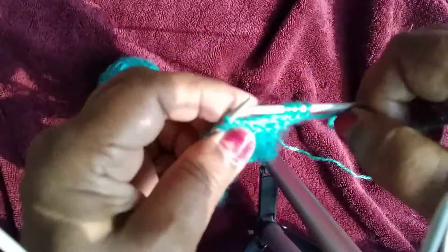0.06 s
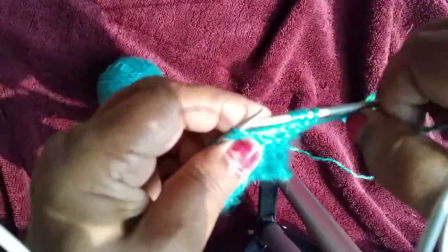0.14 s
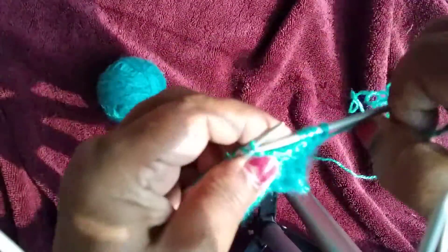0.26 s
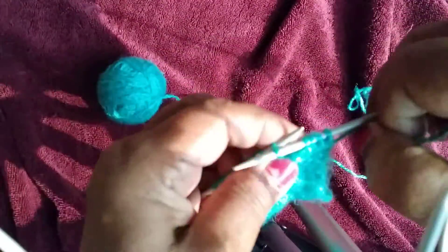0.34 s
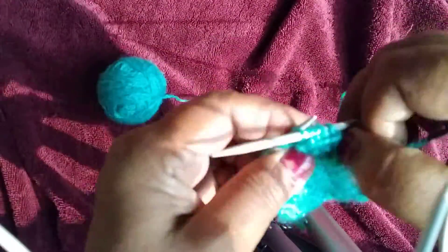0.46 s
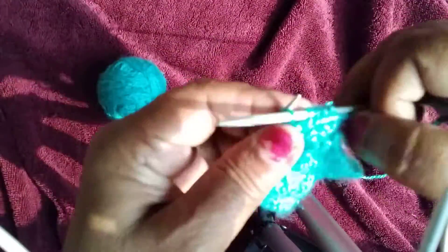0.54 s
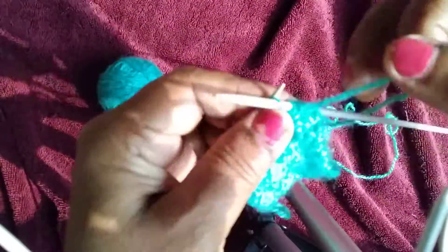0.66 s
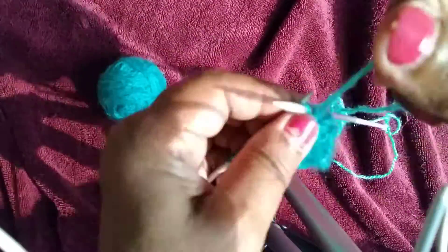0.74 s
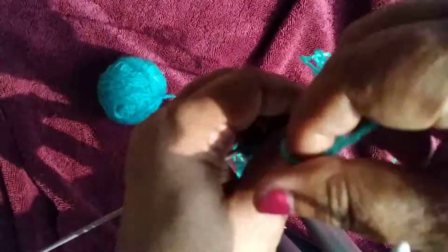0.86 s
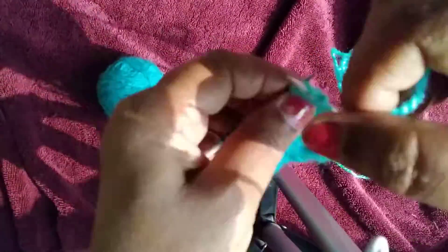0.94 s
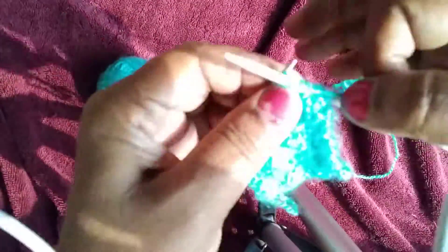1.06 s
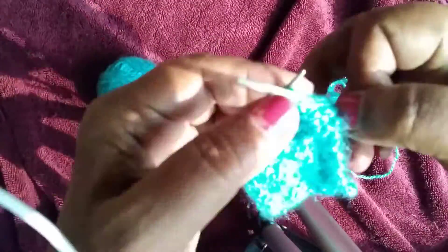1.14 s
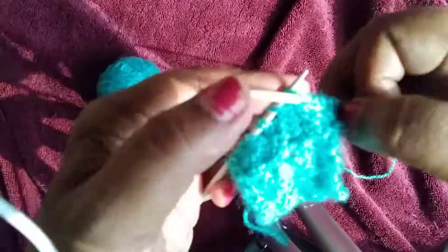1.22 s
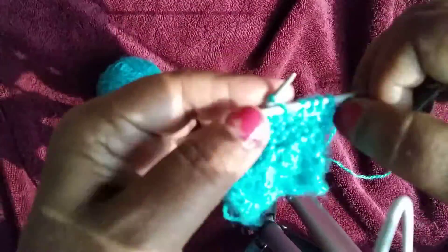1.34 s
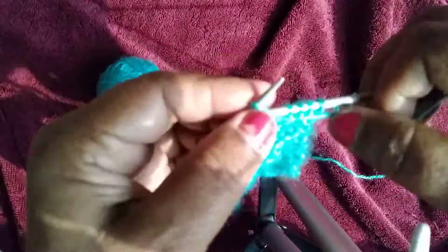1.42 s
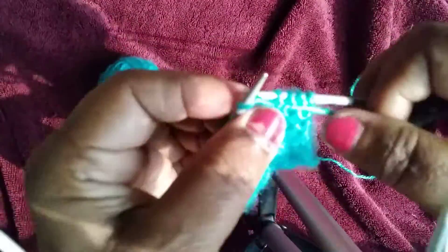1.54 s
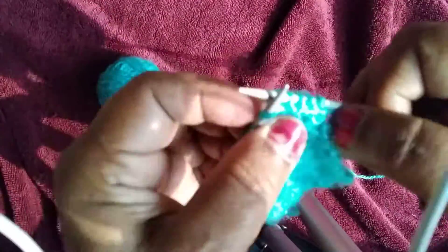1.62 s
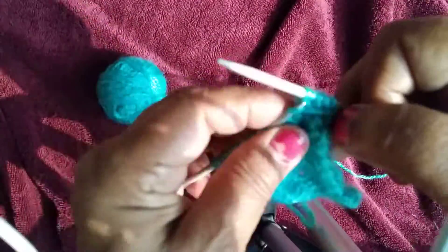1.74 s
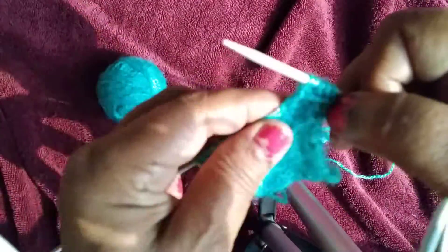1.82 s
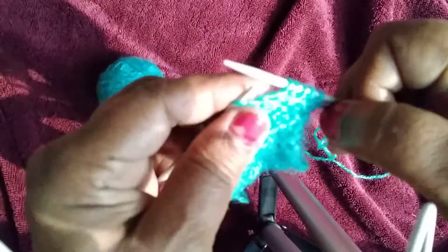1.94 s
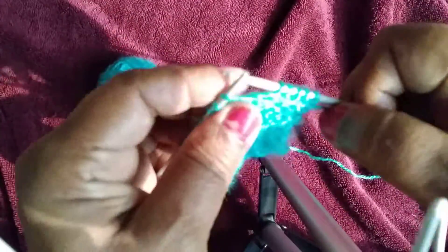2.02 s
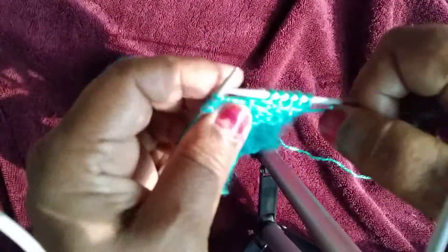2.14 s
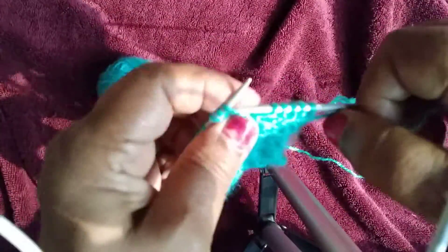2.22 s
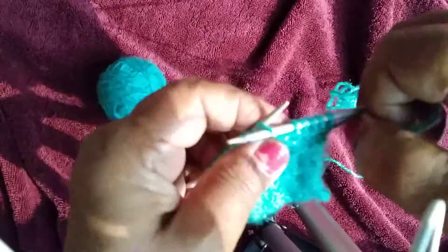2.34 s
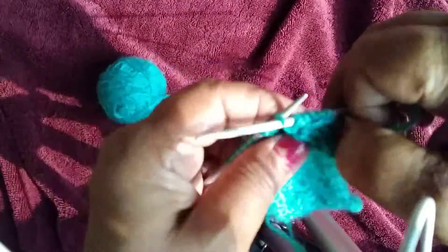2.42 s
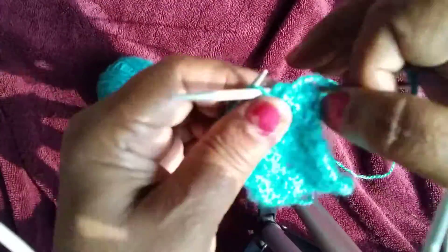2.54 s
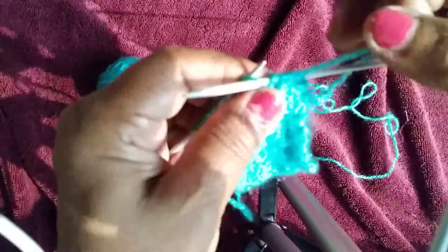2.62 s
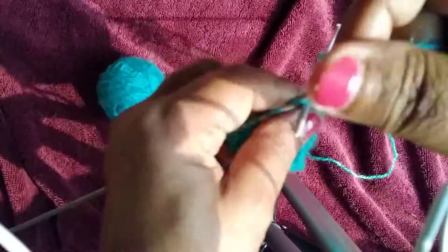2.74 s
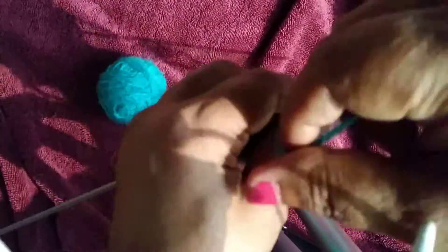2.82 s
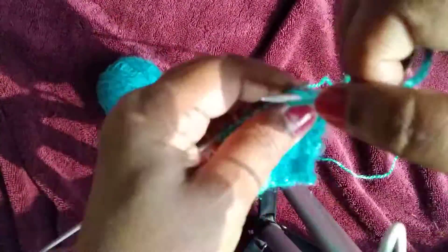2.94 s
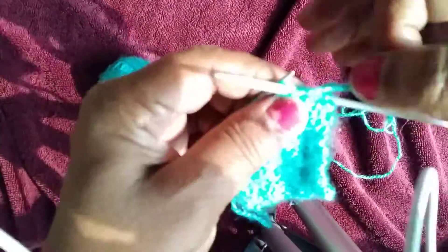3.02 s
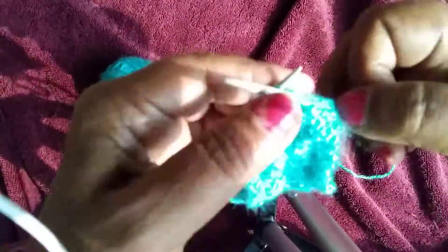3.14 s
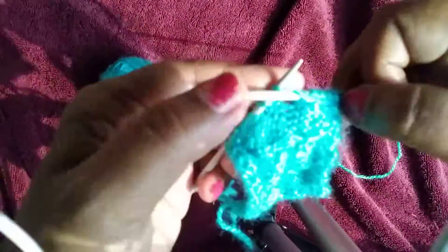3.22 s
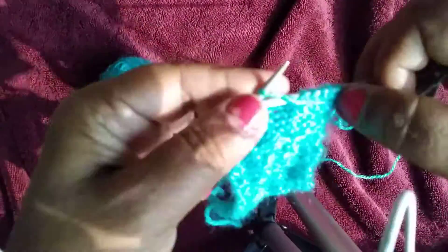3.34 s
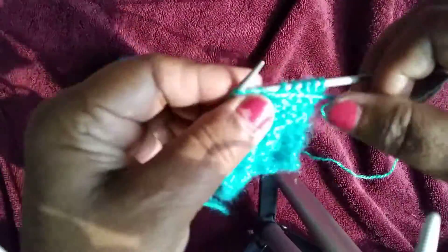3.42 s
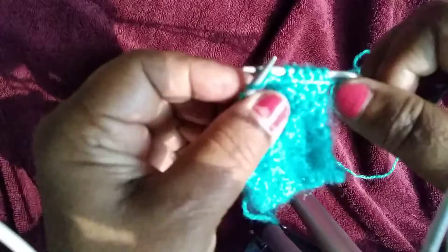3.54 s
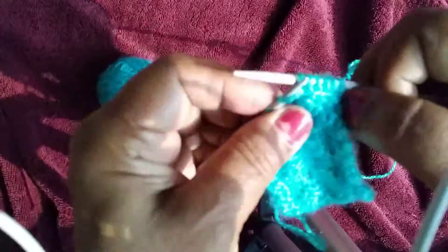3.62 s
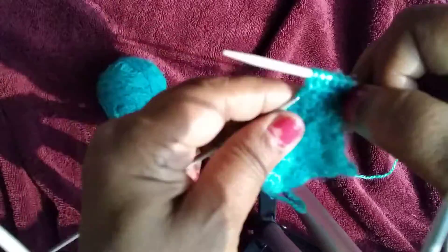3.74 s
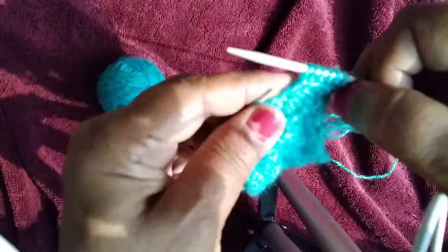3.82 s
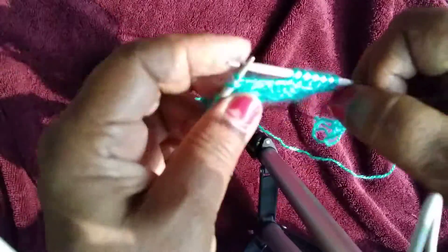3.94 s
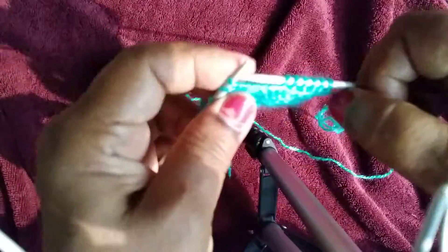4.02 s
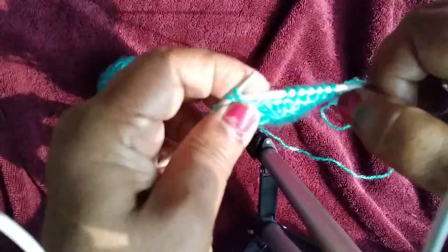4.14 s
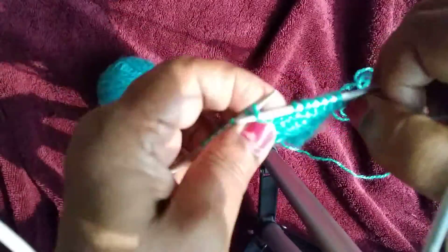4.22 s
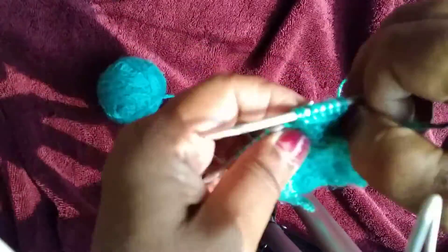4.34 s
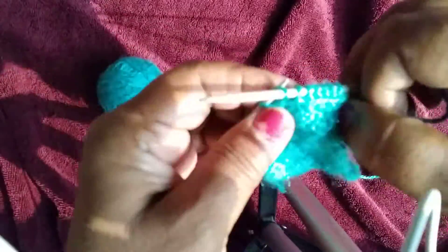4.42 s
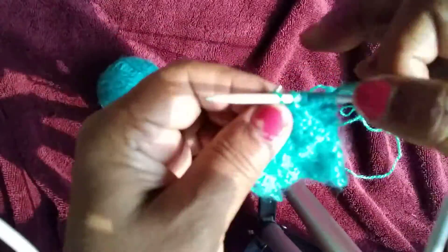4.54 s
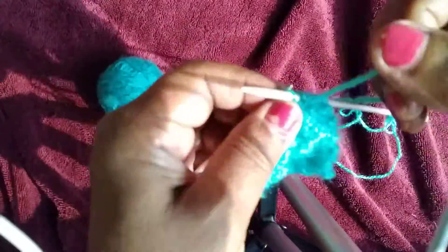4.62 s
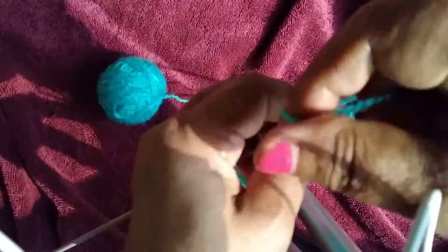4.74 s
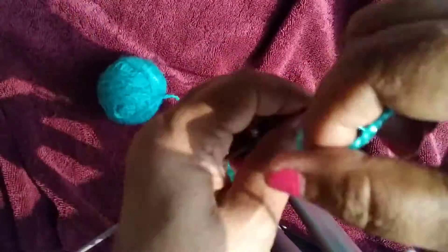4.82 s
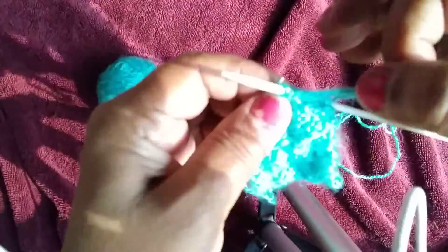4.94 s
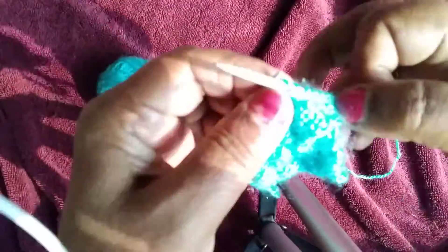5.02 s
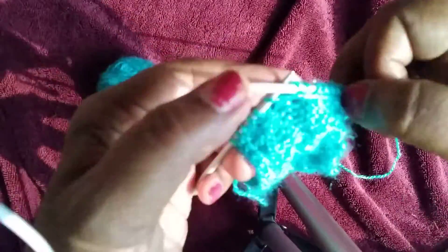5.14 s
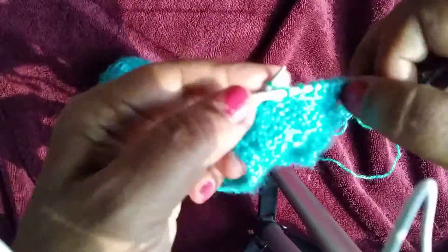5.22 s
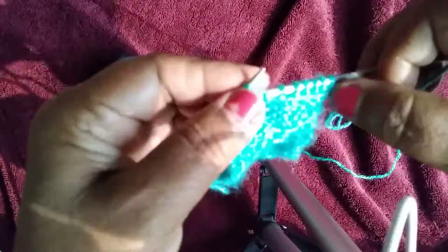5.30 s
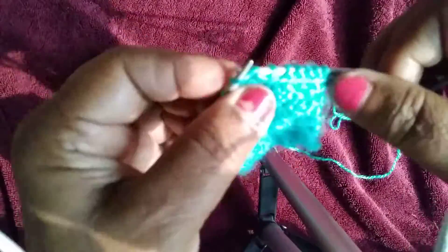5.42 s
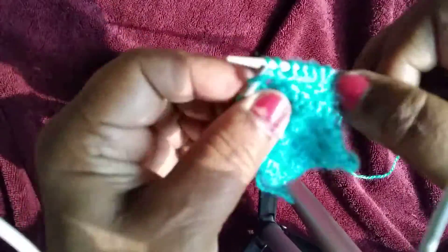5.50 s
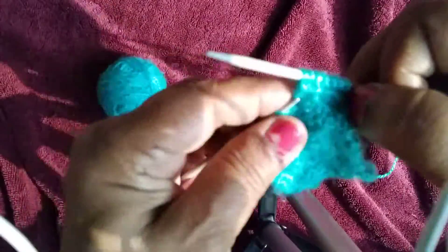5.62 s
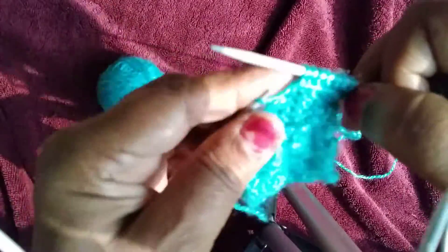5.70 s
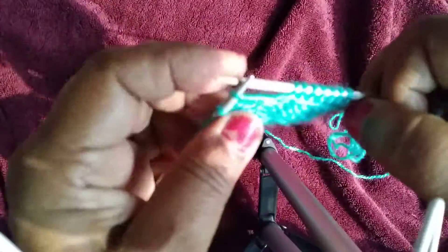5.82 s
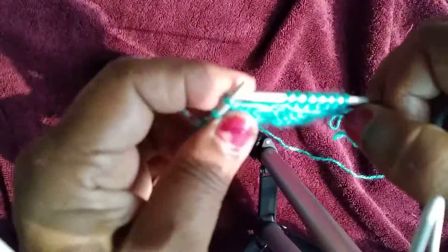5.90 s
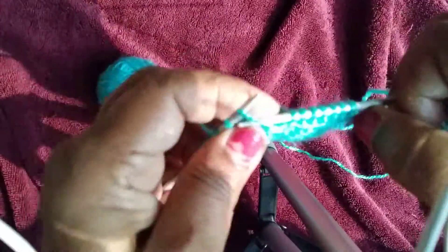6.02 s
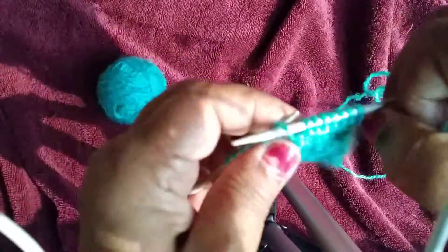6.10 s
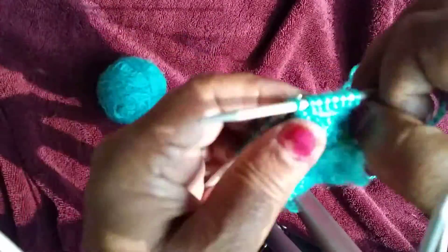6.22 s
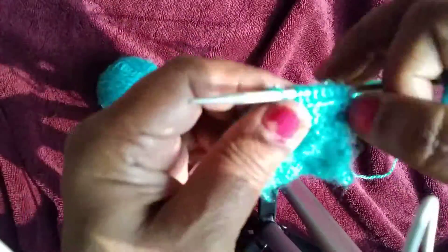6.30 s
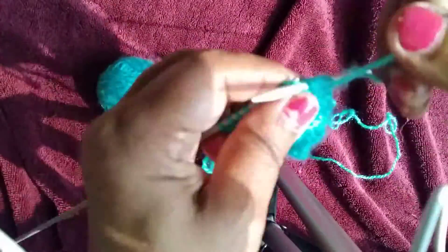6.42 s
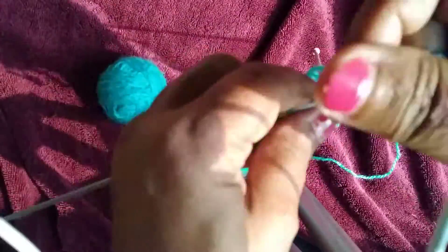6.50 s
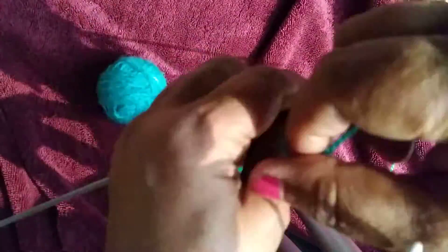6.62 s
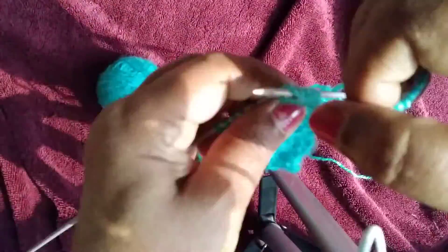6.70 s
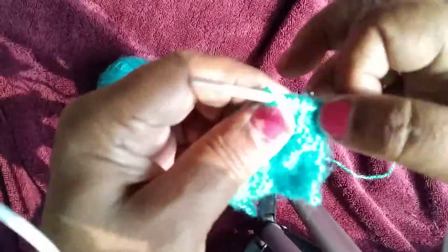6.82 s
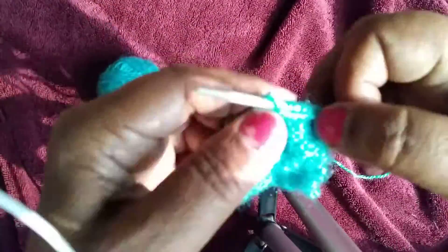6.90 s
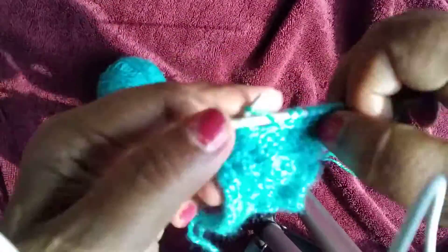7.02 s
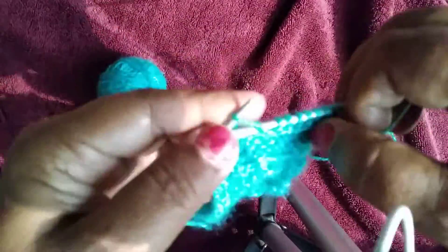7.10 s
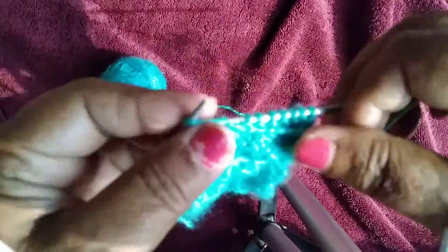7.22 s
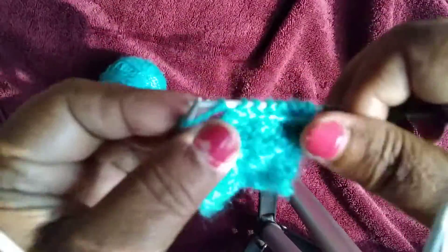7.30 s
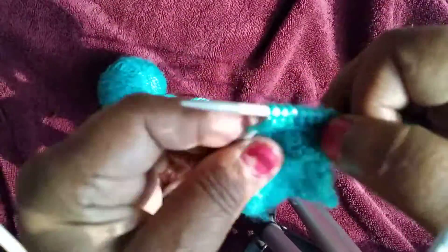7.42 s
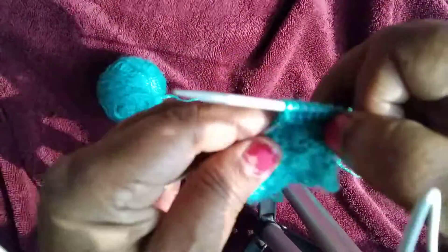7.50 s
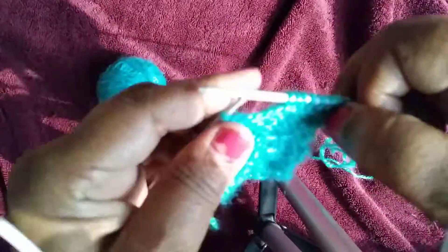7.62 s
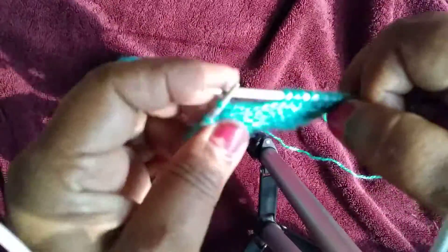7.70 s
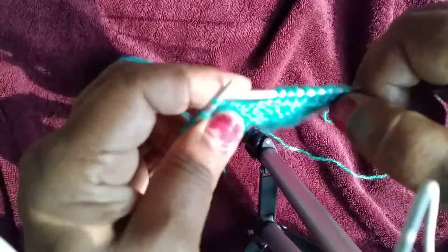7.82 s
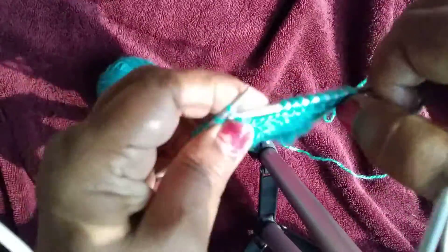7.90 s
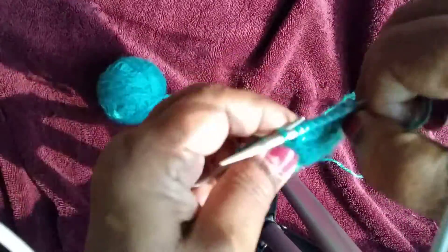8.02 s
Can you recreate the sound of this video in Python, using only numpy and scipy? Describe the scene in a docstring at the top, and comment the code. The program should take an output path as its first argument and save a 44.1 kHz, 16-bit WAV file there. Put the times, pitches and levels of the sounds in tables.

```python
"""Close-up knitting in a small room

Two metal needles tap and chatter: short noise cracks set damped shaft modes ringing.
Their sliding tips, the ticking, brushing wool and the fingers on the work are shaped grainy noise.
Behind them a fan hums in sines over filtered-noise air, and a crow and other birds call
faintly outside as falling, rasping tones. The room answers the hands with a soft echo."""
import sys
import numpy as np
from scipy import signal
from scipy.fft import rfft, irfft, next_fast_len
from scipy.io import wavfile
from scipy.ndimage import uniform_filter1d, minimum_filter1d, map_coordinates

SR = 44100
rng = np.random.default_rng(int(sys.argv[2]) if len(sys.argv) > 2 else 0)


def wav_record(signal):
    """Record a signal, one row per channel, as 16-bit PCM in the file named by sys.argv[1]."""
    frames = np.transpose(np.atleast_2d(signal))
    bounded = np.clip(frames, -1, 1)
    # unit amplitude maps onto the largest positive 16-bit level
    quanta = np.round(bounded * 32767).astype(np.int16)
    wavfile.write(sys.argv[1], SR, quanta)


N = 355446
T = np.arange(N) / SR

# Levels in the tables are relative settings; the source functions may trim them.
# ring of the hand-damped needles: pitch_hz, level_db, t60_s
NEEDLE_MODES = [ (2085, -6.5, 0.055), (2333, -5, 0.032), (3744, -6, 0.04), (4160, -32, .012),
                (5820, -4, 0.03), (6000, -15.5, 0.0175), (7020, 6, 0.015), (7500, 0, 0.013),
                (8180, -1.5, 0.015), (10700, 2, 0.015), (10840, 4, 0.011), (11640, 8.5, 0.009),
                (12200, 2.5, 0.0069), (13480, 9, 0.0095), (14130, -7.5, 0.019), (14800, 10, 0.0073)]
# needles collide and rebound, dying away or pressed harder together:
# start_s, tip_db, shaft_db, body_db, first_gap_s, blows (count), change_per_blow_db
CLATTERS = [(0.8882, -2, -20.5, -39, 0.0068, 4, -0.8), (2.859, -6, -22.5, -42.5, 0.012, 3, 2.5),
            (3.1886, -14.5, -33.5, -43.5, 0.02, 3, 2), (4.8123, -8, -22, -38.5, 0.0068, 3, 1),
            (5.122, -24.5, -36, -43, 0.0091, 2, 2.5), (6.6123, -3, -21, -38.5, 0.0046, 6, -2.5)]
# needle taps, alone or as an extra blow within a clatter: start_s, tip_db, shaft_db
TAPS = [(0.0191, -22.5, -46), (0.5444, -38, -57.5), (0.8461, -20, -34.5), (0.9658, -37, -37.5),
        (0.9798, -33, -36), (1.0125, -26.5, -34.5), (1.608, -32, -51), (1.855, -25, -34),
        (2.1887, -37, -47), (2.2677, -32, -42), (2.4302, -16.5, -38.5), (2.4959, -23.5, -29.5),
        (2.6062, -36, -40), (2.7316, -43, -46), (2.8388, -43, -36.5), (3.4897, -35, -54),
        (3.602, -22.5, -49.5), (3.8015, -32, -36.5), (4.0142, -24.5, -45.5), (4.1634, -21.5, -40),
        (4.2153, -38, -55), (4.5138, -42, -47), (4.7542, -47, -44.5), (4.793, -36, -36), (4.8094, -22, -33),
        (4.8152, -15, -24), (5.4197, -21, -42), (5.4708, -48, -45), (5.497, -29.5, -50),
        (5.7068, -26, -37.5), (5.877, -23, -48), (6.041, -37, -56), (6.0763, -47, -44.5),
        (6.1033, -57, -44.5), (6.185, -26.5, -40), (6.5482, -29, -38.5), (6.8071, -28, -36.5),
        (6.8761, -44, -49.5), (6.9916, -38, -38), (7.3045, -29.5, -43.5), (7.408, -22, -49),
        (7.5538, -50, -45), (7.5976, -41, -40), (7.6958, -33, -49), (7.7458, -32, -48), (7.9868, -32, -37)]
REBOUND = 0.785  # each gap as a share of the one before
REBOUND_DULLING_DB = 4  # each rebound loses this much more at the tip than in the shaft
BODY_DB = -16  # body of the needle relative to its shaft, for taps and grazes
# chance grazes among the taps
GRAZES_PER_S, GRAZE_TIP_DB, GRAZE_SHAFT_DB = 0.96, -51, -50.5

# one needle sliding on the other: start_s, end_s, hiss_db, shaft_ring_db
SLIDES = [(0.39, 0.482, -55, -68), (0.544, 0.638, -55, -65), (1.327, 1.543, -58, -80),
          (1.637, 1.746, -50, -62), (2.431, 2.496, -44.5, -58), (3.605, 3.747, -51.5, -62),
          (4.343, 4.4, -56.5, -58), (5.413, 5.467, -52.5, -68), (5.501, 5.66, -49, -61),
          (6.189, 6.236, -47, -46), (6.313, 6.34, -49, -54.5), (7.04, 7.11, -49.5, -69.5),
          (7.405, 7.525, -49.5, -68)]
# high resonances that sliding excites: pitch_hz, width_hz, level_db
SLIDE_HISS = [(12470, 450, 3), (13900, 600, -1), (14200, 460, -3)]
# lower shaft resonances that sliding excites: pitch_hz, width_hz, level_db
SLIDE_RING = [(6800, 970, -1), (8600, 380, 10), (9300, 1000, -5)]

# wool snapping over needle and fingernails, once or in a run: start_s, level_db, slips (count)
WOOL_TICKS = [(0.2364, -48, 1), (1.2388, -44, 1), (2.4972, -41, 1), (2.9502, -42.5, 1), (6.244, -40.5, 2),
              (6.9328, -48.5, 1), (6.987, -44, 1), (7.4724, -38, 5)]
SLIP_GAP_S = 0.0095
# spectrum of a wool snap: frequency_hz, level_db
WOOL_COLOUR = [(100, -50), (600, -1), (1200, -9), (2500, -3.5), (4800, -4), (6500, -9.5), (9000, -11),
               (16000, -13)]
# spectrum of brushing fibres: frequency_hz, level_db
BRUSH_COLOUR = [(1500, -10), (4000, -17), (8000, -3), (11000, -1), (13500, 5), (15500, 1), (17000, -21)]
# uneven time marks that stretch the swells of the brushing: time_s
BRUSH_MARKS = [1.5, 1.2, 2, 3, 7, 8.5]
# effort curve that gives the brushing its swells: position (share of the curve), level_db
BRUSH_EFFORT = [(0.12, -61.5), (0.28, -65), (0.45, -57.5), (0.72, -64.5), (0.84, -61.5), (0.96, -65)]

# a fingertip rubs along the work, or a fingernail knocks softly (the shortest row):
# start_s, end_s, level_db
FINGER_TOUCHES = [(1.58, 1.673, -70), (2.41, 2.53, -57.5), (2.483, 2.642, -63.5), (3.171, 3.263, -62),
                  (3.466, 3.472, -52), (6.902, 7.022, -73)]
# resonances of the finger on the work: pitch_hz, width_hz, level_db
FINGER_RING = [(1760, 240, -0.5), (2160, 130, 8), (2680, 420, -4)]

# a far crow repeats one caw: start_s, level_db
CAWS = [(1.0, -73), (1.33, -71), (1.885, -69.5), (2.545, -67.5), (3.22, -66.5), (7.275, -66), (7.85, -67)]
CAW_S, CAW_HZ, CAW_RASP = 0.24, 1579, 0.6
# other birds far outside: start_s, length_s, mid_pitch_hz, level_db
BIRD_CALLS = [(1.04, 0.15, 804, -64.5), (1.13, 0.14, 3350, -72), (3.32, 0.05, 837, -62.5),
              (3.541, 0.078, 960, -63.5), (3.597, 0.138, 1135, -69), (3.982, 0.061, 886, -64.5),
              (4.316, 0.11, 684, -65.5)]
BIRD_RASP = 0.46

# fan hum: order (multiple of the shaft rate), level_db
FAN_ORDERS = [(7, -64.5), (10, -64.5), (12, -53), (15, -87), (22, -71.5), (27, -78), (29, -76.5),
              (34, -66.5), (36, -70), (40, -76.5), (43, -77.5), (52, -77), (56, -85), (60, -75.5)]
SHAFT_HZ = 16.77
# spectrum of the fan and room rush: frequency_hz, density_db (per Hz)
ROOM_TONE = [(30, -12), (100, -13), (150, 6), (210, 2), (290, -3.5), (560, -3), (700, -5), (1000, -7),
             (1250, -13), (2000, -16), (3200, -19.5), (6400, -23.5), (11000, -33), (16000, -27.5)]
# spectrum of the deep rumble: frequency_hz, level_db
RUMBLE_COLOUR = [(15, -0.5), (26, 1.5), (36, 1), (48, -7), (65, -11), (95, -16.5), (200, -42), (1000, -67)]
# the deep rumble swells now and then: middle_s, half_length_s, rise_db
RUMBLE_SWELLS = [(1.0, 0.86, 3.5), (3.298, 0.1, 6), (6.8, 0.39, 2.5)]
ROOM_TONE_DB, RUMBLE_DB = -60.5, -50.5
CUTOFF_HZ = 16000


def undb(db):
    """Decibels to gain."""
    return 10 ** (np.asarray(db) / 20)


def unit(x):
    """Scale to rms 1."""
    return x / np.sqrt(np.mean(x ** 2) + 1e-20)


def add(out, start, x):
    """Mix x into out from a start time in seconds."""
    i = max(int(start * SR), 0)
    out[i:i + len(x)] += x[:max(len(out) - i, 0)]


def band(x, lo_hz, hi_hz, order=2):
    """Causal band-pass."""
    edges = [lo_hz, min(hi_hz, SR / 2 - 100)]
    return signal.sosfilt(signal.butter(order, edges, "band", fs=SR, output="sos"), x)


def colour(x, points):
    """Shape x with a spectrum of (Hz, dB) points, joined along log frequency."""
    hz, db = np.transpose(points)
    size = next_fast_len(len(x))
    f = np.maximum(np.fft.rfftfreq(size, 1 / SR), 1)
    gain = undb(np.interp(np.log(f), np.log(hz), db))
    return irfft(rfft(x, size) * gain, size)[:len(x)]


def resonate(x, peaks):
    """Sum of resonances (Hz, width Hz, dB), at rms 1."""
    return unit(sum(undb(db) * band(x, hz - width / 2, hz + width / 2, order=1)
                    for hz, width, db in peaks))


def walk(rate):
    """Random drift at rms 1, joining `rate` random points a second."""
    return unit(np.interp(T * rate, np.arange(4096), rng.standard_normal(4096)))


def grains(n, spread_db):
    """Noise of countless tiny slips of unequal size, at rms 1."""
    return unit(rng.standard_normal(n) * undb(spread_db * rng.standard_normal(n)))


def contacts(settle_s=0.046, settle_tip_db=-29, settle_shaft_db=-20, settle_body_db=-14,
             settle_count=3):
    """Needle touches (s, tip dB, shaft dB, body dB): taps, chance grazes, rebounds at shrinking gaps."""
    graze_starts = np.cumsum(rng.exponential(1, 12)) / GRAZES_PER_S
    grazes = [(start, GRAZE_TIP_DB, GRAZE_SHAFT_DB) for start in graze_starts]
    touches = [(start, tip_db, shaft_db, shaft_db + BODY_DB)
               for start, tip_db, shaft_db in list(TAPS) + grazes]
    for start, tip_db, shaft_db, body_db, gap, blows, change_db in CLATTERS:
        for k in range(int(round(blows))):
            step_db = k * change_db
            blow_tip_db = tip_db + step_db - k * REBOUND_DULLING_DB
            touches.append((start, blow_tip_db, shaft_db + step_db, body_db + step_db))
            start += gap * REBOUND ** k
        # the needles settle with a few faint touches
        for late in settle_s * rng.random(settle_count) ** 2:
            touches.append((start + late, tip_db + settle_tip_db, shaft_db + settle_shaft_db,
                            body_db + settle_body_db))
    return touches


def clicks(contact_s=0.00052, rise_s=0.00041, ring_db=-21, detune=0.015, scatter_db=4,
           tip_db=-5.5, shaft_db=-5.0, body_db=-3.5, knock_db=-15, chatter_db=-16,
           chatter_s=0.0025, linger_db=-25, linger_ratio=4.5, linger_below_hz=6500):
    """Each contact is a brief noise crack that leaves the needles ringing as damped modes."""
    out, t = np.zeros(N), np.arange(SR // 9) / SR
    hz, db, t60 = np.transpose(NEEDLE_MODES)[:, :, None]
    attack = int(.003 * SR)  # opening samples that set the level
    # the fingers damp most of the ring at once; the lowest modes linger faintly
    linger = (hz < linger_below_hz) * undb(linger_db - 60 * t / (t60 * linger_ratio))
    decay = undb(-60 * t / t60) + linger
    for start, *levels in contacts():
        # grip and contact point vary, and with them the modes' pitch and share
        shift, share, phase = rng.standard_normal((3, len(hz), 1))
        tones = np.sin(2 * np.pi * (hz * (1 + detune * shift) * t + phase))
        ring = undb(db + scatter_db * share) * decay * tones
        crack = rng.standard_normal(len(t)) * np.exp(-t / contact_s)
        # hard blows chatter on for a few milliseconds in tiny rebounds
        force = np.interp(levels[0], [-30, -15], [0, 1])
        chatter = grains(len(t), spread_db=2.5) * np.exp(-t / chatter_s)
        crack += force * undb(chatter_db) * chatter
        blow = (crack + undb(ring_db) * ring.sum(0)) * np.minimum(t / rise_s, 1) ** 2
        # a touch at the very tip hardly moves the shaft and sounds higher still
        tip_hz = np.interp(levels[0] - levels[1], [12, 21], [9800, 12200])
        registers = [(tip_hz, 16500), (5200, 9400), (1900, 4900)]  # tip, shaft, body
        for (lo, hi), level_db, trim_db in zip(registers, levels, (tip_db, shaft_db, body_db)):
            part = band(blow, lo, hi, order=3)
            add(out, start, part * undb(level_db + trim_db) / np.std(part[:attack]))
        # the blow also passes into the fingers as a faint knock
        knock = band(crack, 950, 1710)
        add(out, start, knock * undb(levels[-1] + knock_db) / np.std(knock[:attack]))
    return out


def slides(hiss_db=-2, ring_db=-3, judder_db=4.0, edge=0.29, ease_db=3, flutter_db=2.5):
    """Metal rubs on metal: fine slips sing in the shafts while the pressure wavers and eases off."""
    out = np.zeros(N)
    judder = undb(judder_db * walk(110) + flutter_db * walk(380))
    glide = .014 * walk(30)
    for start, end, high_db, low_db in SLIDES:
        n = max(int((end - start) * SR), 64)
        hiss = resonate(band(grains(n, spread_db=6), 11500, 17000, order=3), SLIDE_HISS)
        ring = resonate(band(grains(n, spread_db=6), 6000, 10000), SLIDE_RING)
        rub = undb(high_db + hiss_db) * hiss + undb(low_db + ring_db) * ring
        # the resonances glide as the contact point travels
        read_at = np.cumsum(1 + np.roll(glide, -int(start * SR))[:n])
        rub = map_coordinates(rub, [read_at], order=5)
        pressure = signal.windows.tukey(n, min(edge, 1)) * undb(ease_db * np.linspace(.5, -.5, n))
        add(out, start, rub * pressure)
    return out * judder


def wool(tick_s=0.0028):
    """Yarn snaps as dull, decaying noise bursts over the soft brushing of fibres."""
    snaps, t = np.zeros(N), np.arange(SR // 50) / SR
    for start, db, slips in WOOL_TICKS:
        for k in range(int(round(slips))):
            snap = rng.standard_normal(len(t)) * np.exp(-t / tick_s)
            add(snaps, start + k * SLIP_GAP_S, undb(db) * snap)
    brushing = unit(colour(grains(N, spread_db=5), BRUSH_COLOUR))
    # one effort curve gives the brushing its uneven swells, with a small random waver
    position = np.interp(T, BRUSH_MARKS, np.arange(len(BRUSH_MARKS)))
    effort_db = np.interp(position, *np.transpose(BRUSH_EFFORT), period=1) + 1.2 * walk(40)
    return 2 * colour(snaps, WOOL_COLOUR) + brushing * undb(effort_db)


def fingers():
    """Fingers rub or softly knock the work: grainy slips excite low resonances."""
    out = np.zeros(N)
    for start, end, db in FINGER_TOUCHES:
        n = max(int((end - start) * SR), 64)
        touch = resonate(band(grains(n, spread_db=5), 1300, 4000), FINGER_RING)
        add(out, start, undb(db) * touch * signal.windows.tukey(n, .5))
    return out


def echo(x, t60, lo_hz, hi_hz, gap_s):
    """Diffuse reflections as a unit-energy decaying noise tail, fading in after a short gap."""
    t = np.arange(SR) / SR
    fade_in = np.clip(t / gap_s - 1, 0, 1)
    tail = band(rng.standard_normal(SR), lo_hz, hi_hz, order=1) * undb(-60 * t / t60) * fade_in
    return signal.fftconvolve(x, tail / np.linalg.norm(tail))[:N]


def calls(fall=0.0893, rasp_hz=90, swell=0.49):
    """Slightly falling sine calls, roughened by a fast wandering throb; the caws rasp more."""
    out = np.zeros(N)
    throb = np.sin(2 * np.pi * np.cumsum(rasp_hz * (1 + .4 * walk(120))) / SR)
    caws = [(start, CAW_S, CAW_HZ, db, CAW_RASP) for start, db in CAWS]
    others = [(*row, BIRD_RASP) for row in BIRD_CALLS]
    for start, length, hz, db, rasp in caws + others:
        u = np.linspace(0, 1, int(length * SR))
        tone = np.sin(2 * np.pi * np.cumsum(hz * (1 + fall * (.5 - u))) / SR)
        roughness = 1 + 2 * rasp * np.roll(throb, int(start * SR))[:len(u)]
        envelope = np.abs(np.sin(np.pi * u)) ** swell
        add(out, start, undb(db) * unit(tone * roughness * envelope))
    return out


def birds(direct_db=-6, echo_db=-2):
    """The calls arrive blurred by distance, as direct sound plus a diffuse tail."""
    near = calls()
    blurred = echo(near, t60=0.59, lo_hz=300, hi_hz=6130, gap_s=0.0043)
    return undb(direct_db) * near + undb(echo_db) * blurred


def fan(wander=0.001993, waver_db=0.37):
    """The motor hums on multiples of its slightly wandering shaft rate."""
    turns = np.cumsum(SHAFT_HZ * (1 + wander * walk(2))) / SR
    hum = np.zeros(N)
    for order, db in FAN_ORDERS:
        tone = np.sin(2 * np.pi * (round(order) * turns + rng.random()))
        hum += np.sqrt(2) * undb(db + waver_db * walk(3.4)) * tone  # root 2: dB are rms
    return hum


def air(swell_db=1.0):
    """The fan's gently wavering noise rush over a deep, uneven rumble."""
    rush = colour(rng.standard_normal(N), ROOM_TONE)
    rush /= np.std(band(rush, 250, 1100))  # level is set in this band
    rumble = unit(colour(rng.standard_normal(N), RUMBLE_COLOUR))
    swells_db = sum(db * np.exp(-((T - middle) / half) ** 2) for middle, half, db in RUMBLE_SWELLS)
    rush_gain = undb(ROOM_TONE_DB + swell_db * walk(2.795))
    return rush * rush_gain + rumble * undb(RUMBLE_DB + swells_db)


def scene():
    """The hands are close to the microphone, so the room answers only softly."""
    hands = clicks() + slides() + wool() + fingers()
    room = undb(-16.5) * echo(hands, t60=0.24, lo_hz=1200, hi_hz=12900, gap_s=0.00093)
    return (hands + room + birds() + fan() + air())[None]


def record(dry):
    """The recorder drops the deepest rumble, limits the sharpest clicks and cuts the top."""
    dry = signal.sosfilt(signal.butter(2, 18, "high", fs=SR, output="sos"), dry)
    gain = np.minimum(1, .68 / (np.abs(dry) + 1e-9))
    # hold each dip for 65 samples, then smooth it
    gain = uniform_filter1d(minimum_filter1d(gain, size=65), size=65)
    top_cut = signal.ellip(8, .2, 60, CUTOFF_HZ, fs=SR, output="sos")
    return signal.sosfilt(top_cut, dry * gain)


dry = scene()
out = record(dry)
wav_record(out)
```